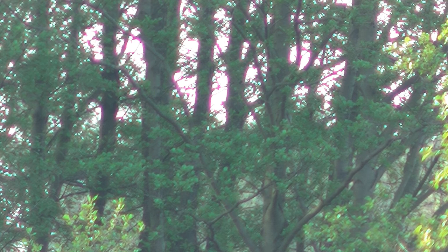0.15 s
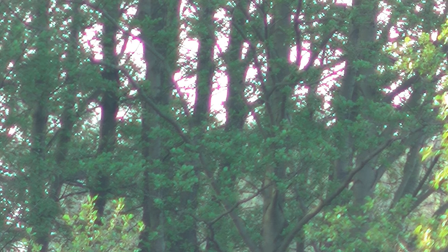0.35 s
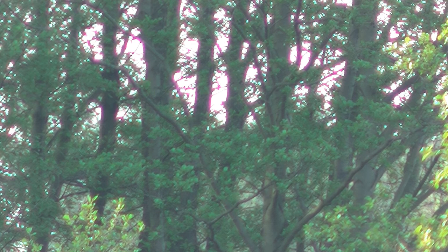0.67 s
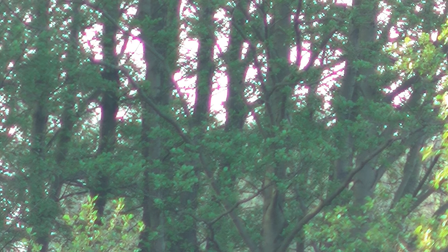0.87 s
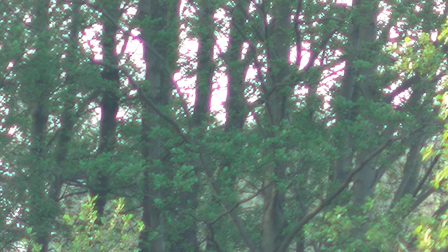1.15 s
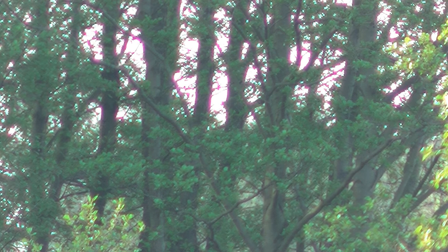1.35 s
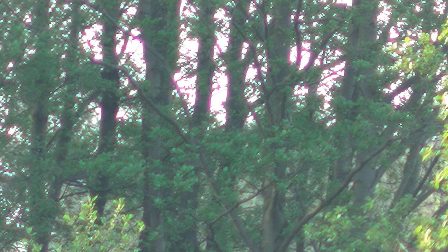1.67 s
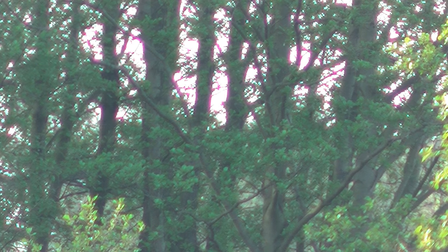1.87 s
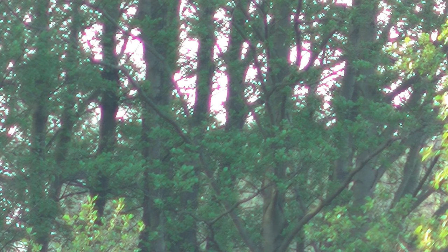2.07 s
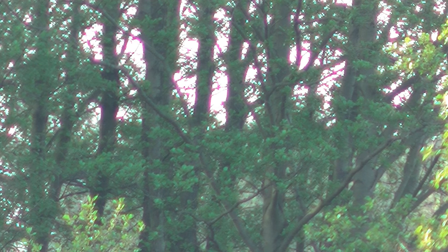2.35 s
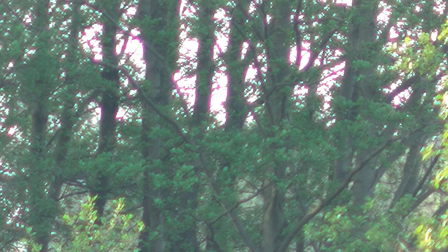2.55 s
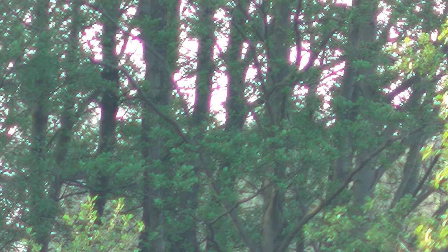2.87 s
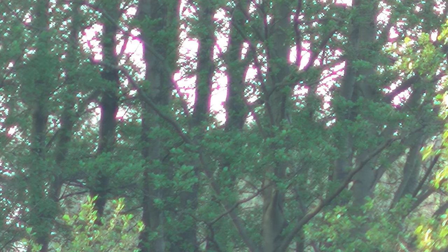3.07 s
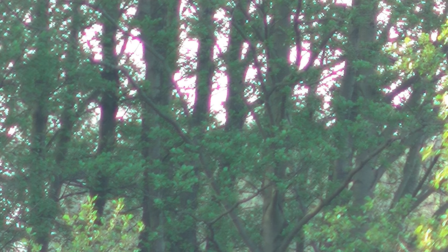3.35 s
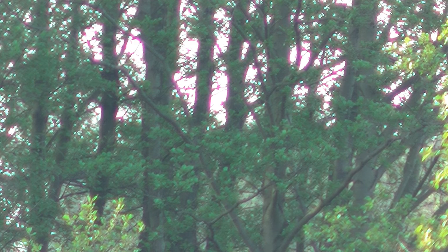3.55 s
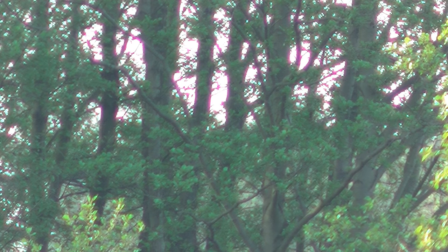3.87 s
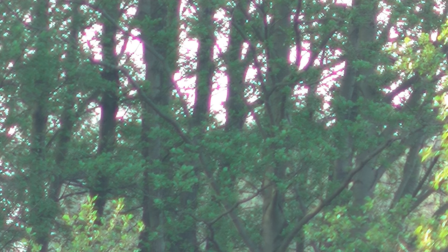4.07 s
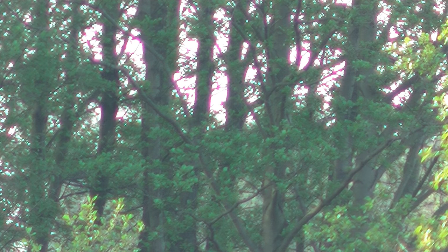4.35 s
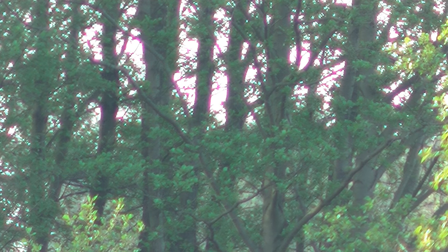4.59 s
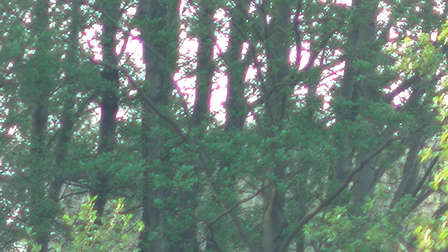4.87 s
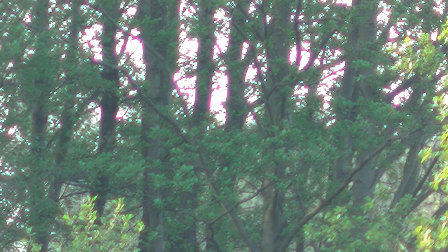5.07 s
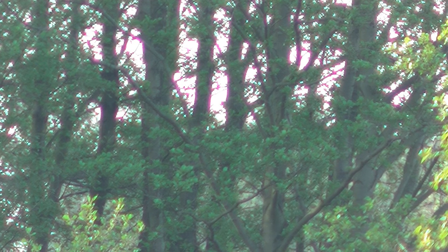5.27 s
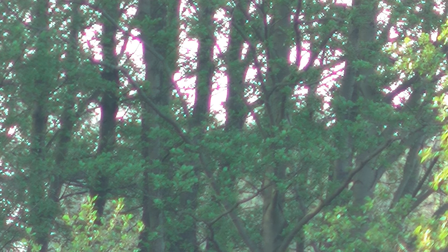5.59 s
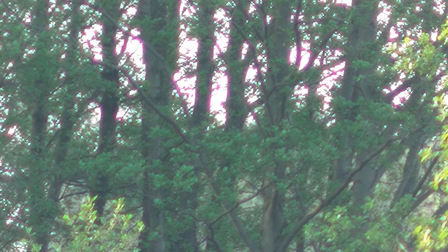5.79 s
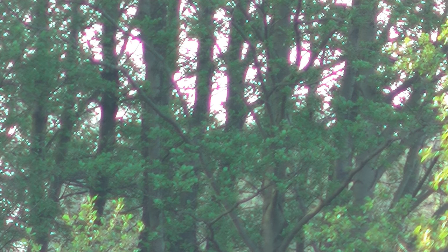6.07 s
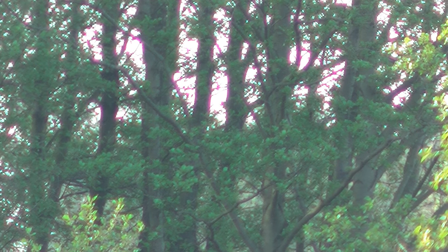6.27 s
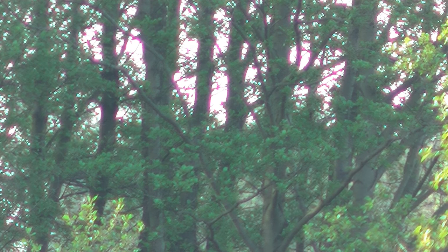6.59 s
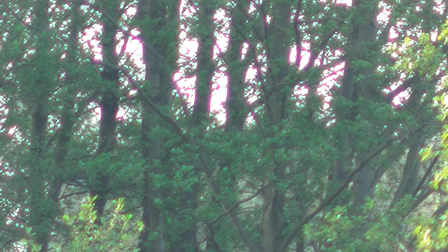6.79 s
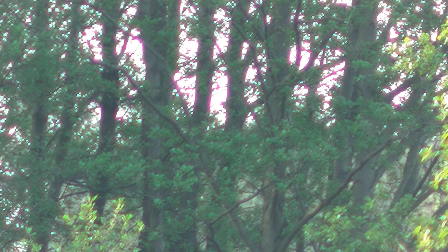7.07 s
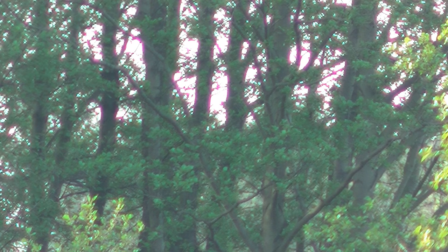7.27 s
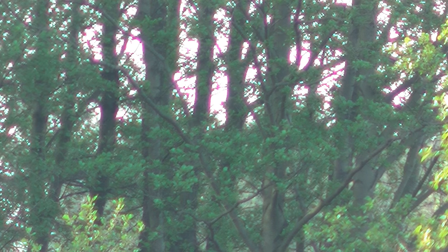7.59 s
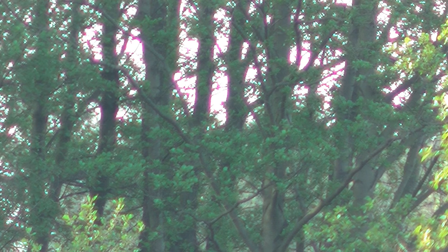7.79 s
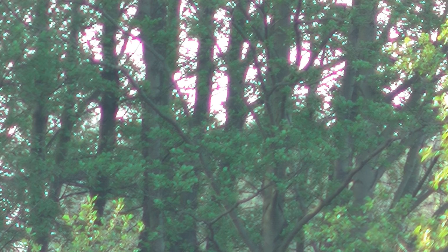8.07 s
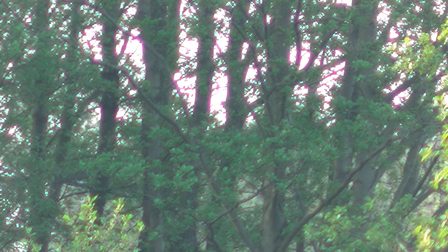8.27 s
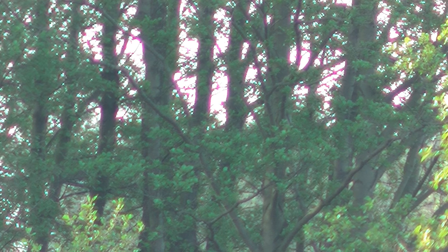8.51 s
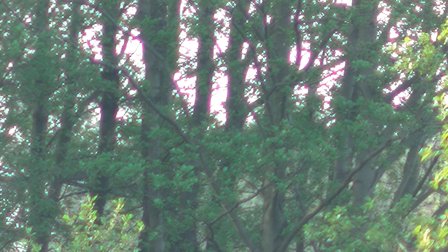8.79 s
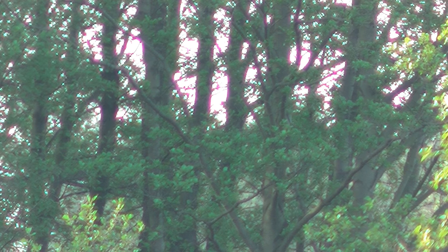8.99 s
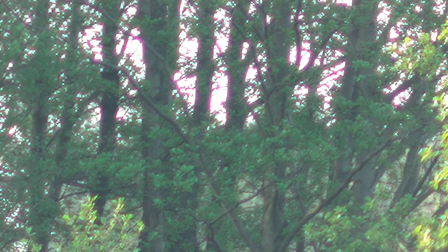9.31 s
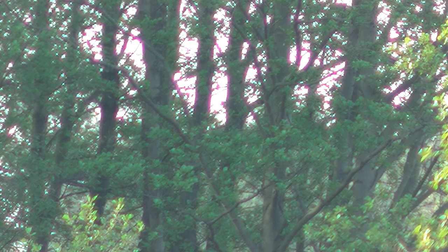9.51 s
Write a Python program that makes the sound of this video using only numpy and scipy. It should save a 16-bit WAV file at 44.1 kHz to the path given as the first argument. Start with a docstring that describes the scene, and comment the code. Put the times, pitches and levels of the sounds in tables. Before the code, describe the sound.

Quick gliding chirps and whistles fill a woodland, with two small bill snaps and a thin, high trill early on. A woodpecker then hammers out a single dry roll lasting about a second and a half. The singing continues through rattles and warbles, grows into louder sweeps and closes with short buzzes. Light echoes, faraway birds and a soft hiss with a faint high whine lie around the closer calls.

```python
"""Spring woodland. From the start, songbirds near and far chirp and whistle, each note a gliding tone of the
syrinx trailing echoes off the trunks. Two bill snaps and a high trill lead up to a woodpecker, which
drums one long roll on a dead limb from about 2 to 3.6 s, every blow a short, choked ring. The birds
sing on with warbles and rattles, then loud sweeps, and close on harsh buzzes after 9 s. Under it all
lie a distant chorus and the faint hiss and whine of air and circuits."""
import sys
import numpy as np
from scipy import signal
from scipy.fft import rfft, irfft, next_fast_len
from scipy.io import wavfile
from scipy.ndimage import uniform_filter1d, map_coordinates

SR = 44100
rng = np.random.default_rng(int(sys.argv[2]) if len(sys.argv) > 2 else 0)


def transcribe(signal):
    """Save signal, clipped to [-1, 1], as a 16-bit WAV file at the path in sys.argv[1]."""
    frames = np.atleast_2d(signal).T
    limited = np.clip(frames, -1, 1)
    pcm = np.round(limited * 32767).astype(np.int16)
    wavfile.write(sys.argv[1], SR, pcm)


N = 425565

# The landmarks of the roll. Each entry: a blow number, counted from 0.
LANDMARK_BLOWS = [0, 3, 8, 15, 18, 30, 31]
# The roll at those landmarks. Each row: time in seconds, relative level in dB.
ROLL_SHAPE = [(1.951, -24), (2.1105, -18.5), (2.377, -19), (2.7598, -18), (2.9224, -18.5), (3.5846, -18),
              (3.641, -22)]
# The ring of the dead limb. Each row: frequency in Hz, relative level in dB.
LIMB_MODES = [(1190, -6), (1290, 0), (1440, -7), (1760, -3), (2240, -9)]


def woodpecker_roll(pace_slip_s=.0007, force_slip_db=.7):
    """Each blow rings the limb for a few cycles; soft dead wood chokes it. The roll swells and slows."""
    number = np.arange(LANDMARK_BLOWS[-1] + 1)
    starts, levels = (np.interp(number, LANDMARK_BLOWS, column) for column in np.transpose(ROLL_SHAPE))
    slip = rng.standard_normal((len(number), 2))
    starts += pace_slip_s * slip[:, 0]
    levels += force_slip_db * slip[:, 1]
    out, t = np.zeros(N), np.arange(SR // 30) / SR
    attack = 1 - np.exp(-t / .0003)
    choke = np.exp(-(t / .0038) ** 4)
    tail = amp(-15 - 60 * t / .05)
    for start, db in zip(starts, levels):
        ring = sum(amp(mode_db + rng.normal(0, .8)) * np.sin(2 * np.pi * hz * t)
                   for hz, mode_db in LIMB_MODES)
        out[round((start - .001) * SR):][:len(t)] += amp(db - 5) * attack * (choke + tail) * ring
    return filtered(out, lambda f: 1 / (1 + (1110 / (f + 1)) ** 12))  # a slim limb radiates no bass


# The strokes of each syllable. Each row: delay and length in seconds, first, middle and last pitch
# in Hz, level in dB against the syllable.
SYLLABLE_STROKES = { "dive": [(0, 0.0148, 4154, 3845, 3500, 0), (.014, .021, 3424, 2945, 2420, -6)],
                    "low hook": [(0, .012, 2035, 1920, 1690, 1), (.04, 0.0228, 1380, 1870, 2200, -5)],
                    "swing": [(0, 0.024, 3195, 3785, 4190, 0), (.022, 0.016, 4066, 3570, 3300, -2)],
                    "plateau": [(0, .07, 3914, 3993, 3684, 0), (.003, 0.074, 2660, 2665, 2450, -10.5)],
                    "stutter": [(0, 0.015, 3610, 3585, 3480, 0.5), (.038, 0.028, 3645, 3830, 3770, 2),
                    (.048, .028, 2580, 2520, 2500, -6), (.002, .014, 4320, 4220, 4100, -8),
                    (.002, .014, 3000, 2910, 2780, -11), (.04, .018, 4350, 4450, 4400, -11),
                    (.04, .018, 3110, 3150, 3090, -6)], "rasp": [(0, .022, 4160, 3820, 3000, 0),
                    (.023, 0.028, 3100, 2730, 2600, -4.5), (.01, .032, 4500, 4000, 3300, -7)],
                    "double chip": [(0, .021, 3253, 3210, 2740, 0.5), (0, 0.015, 4270, 4025, 3690, -1.5)],
                    "climb": [(0, .062, 2806, 3415, 3870, 0), (.057, 0.012, 4030, 4000, 4000, -5)],
                    "slash": [(0, 0.013, 6600, 6240, 5500, 0)], "upturn": [(0, 0.012, 1970, 2230, 2550, 0)],
                    "hook": [(0, 0.017, 4050, 4100, 3450, 0)], "flick": [(0, .011, 4100, 4280, 4670, 0)],
                    "rattle": [(-.007, 0.0074, 4420, 3980, 3700, -10.5), (0, .012, 3674, 3200, 2917, 0)],
                    "kick": [(0, .068, 2800, 3220, 3380, -0.5), (0.032, .03, 3300, 3620, 4400, -1),
                    (.014, 0.037, 4120, 4180, 4700, -5.5), (0.0015, 0.035, 4500, 4780, 4950, -19.5)],
                    "tumble": [(0.0008, .026, 3100, 2550, 2050, -8.5), (.01, 0.0205, 4800, 4450, 4700, -15),
                    (.054, 0.01414, 3500, 3250, 2700, 0), (.067, .024, 2650, 2250, 2060, -3),
                    (.062, 0.02, 4800, 4500, 3800, -12)], "droop": [(0, .013, 2200, 2213, 1940, 0.5),
                    (.013, 0.0272, 1880, 1625, 1400, -11.5)], "whip": [(0, .018, 2800, 3350, 3900, 0)],
                    "tall whip": [(0, .013, 2910, 3500, 4190, 0), (.013, .006, 4300, 4400, 4400, -0.56)],
                    "low whip": [(0.0012, .02, 2400, 2500, 2860, 0)],
                    "sweep": [(0.0019, .032, 3050, 3850, 4400, 0), (0.035, .014, 4450, 4650, 4750, -8.5),
                    (0.0035, 0.044, 2420, 2640, 2880, -14.5)], "stab": [(0, .022, 4200, 3650, 3350, -1),
                    (0.014, .016, 3350, 3150, 2950, -5), (.037, 0.0176, 2950, 2750, 2550, -15),
                    (0.0046, 0.016, 4750, 4600, 4900, -16.5), (0.0072, 0.013, 4350, 3600, 3800, -3)],
                    "arc": [(0, 0.071, 3280, 3433, 3550, 0.2), (.06, .04, 3470, 3100, 2500, -2.2)],
                    "thin song": [(-.02, .08, 8090, 8050, 7990, -10), (.062, .115, 7950, 7880, 7850, -3),
                    (.265, .19, 7780, 7790, 7760, -4), (.517, 0.016, 6330, 7000, 7250, -1.5),
                    (.534, 0.029, 7250, 6830, 6250, 0), (.617, .015, 6300, 6900, 7100, -3),
                    (.632, 0.024, 7100, 6740, 6400, -3)]}
# The cues for each syllable. Each row: start in seconds, level in dB.
SYLLABLE_CUES = { "dive": [(.02, -21.5), (.303, -23), (.556, -21.5), (.787, -22), (1.017, -21.5)],
                 "low hook": [(.476, -33), (.709, -32), (.941, -35)], "swing": [(1.097, -26),
                 (1.208, -27.5), (1.318, -25.5), (1.427, -26.5)], "plateau": [(1.593, -27.5), (1.788, -26),
                 (2.023, -27)], "stutter": [(2.274, -29), (2.479, -24.5), (2.682, -22.5)],
                 "rasp": [(2.922, -23), (3.028, -25.5), (3.188, -26), (3.29, -29.5)],
                 "double chip": [(3.47, -29.5), (3.515, -22.5), (3.564, -23)], "climb": [(3.76, -22),
                 (4.027, -24)], "slash": [(3.74, -44), (3.822, -41), (3.837, -40), (3.851, -39)],
                 "upturn": [(3.963, -34), (3.982, -31), (4.005, -30.5)], "hook": [(4.249, -36), (4.3, -30),
                 (4.356, -24.5)], "flick": [(4.397, -32), (4.477, -31.5), (5.047, -31)],
                 "kick": [(5.378, -22.5), (5.666, -23), (5.911, -23)], "tumble": [(6.241, -24),
                 (6.466, -25), (6.693, -23.5)], "droop": [(6.075, -34), (6.347, -35.5), (6.598, -35),
                 (6.835, -33), (7.057, -35)], "whip": [(7.343, -23), (7.478, -22.5)],
                 "tall whip": [(7.288, -22), (7.657, -23.5)], "low whip": [(7.386, -29.5), (7.7, -30.5)],
                 "sweep": [(7.806, -22.5), (7.98, -21), (8.143, -21.5), (8.337, -20.5)],
                 "stab": [(8.558, -21), (8.741, -19.5), (8.961, -20.5)], "arc": [(9.062, -29.5),
                 (9.412, -25.5)], "thin song": [(2.75, -39), (9.0, -35)]}
# One-off notes. Each row: start and length in seconds, first, middle and last pitch in Hz, level in dB.
SINGLE_NOTES = [(.009, 0.054, 3300, 2974, 2610, -24.5), (.115, .039, 3460, 2710, 2500, -35.5),
                (.495, 0.058, 4240, 3880, 3330, -32.5), (.509, 0.048, 5610, 4960, 4500, -41),
                (0.739, 0.094, 3200, 2715, 2350, -32), (.877, .1, 5770, 4440, 4090, -32.5),
                (1.045, 0.038, 3850, 3740, 3730, -29), (1.275, 0.038, 3700, 3840, 3630, -30.5),
                (1.28, 0.097, 2450, 2550, 2390, -35), (1.45, .062, 2470, 2420, 2440, -41.5),
                (3.135, 0.045, 2985, 2800, 2550, -37), (2.444, .027, 3630, 3420, 3090, -32),
                (3.77, 0.064, 6900, 6700, 6420, -47), (3.864, 0.038, 5690, 5200, 5060, -36.5),
                (3.884, 0.055, 3770, 3450, 3460, -33.5), (3.911, 0.068, 1800, 1894, 2000, -39),
                (4.023, 0.047, 2023, 1960, 1900, -35), (4.131, 0.041, 3600, 4000, 4460, -37.5),
                (4.386, 0.067, 3620, 3050, 2440, -24), (4.455, 0.046, 2750, 2910, 2900, -34),
                (4.544, 0.088, 1970, 2100, 2220, -31), (4.548, 0.032, 3950, 3680, 3550, -31.5),
                (4.66, 0.081, 3300, 3680, 3780, -31), (4.881, 0.058, 3450, 3240, 2980, -24),
                (5.294, 0.078, 2530, 2440, 2390, -33.5), (5.362, 0.056, 1720, 1786, 1800, -36.5),
                (6.888, 0.038, 3800, 3150, 2870, -36.5), (6.993, 0.024, 3770, 2920, 4030, -28.5),
                (7.068, 0.026, 2340, 2610, 4450, -30.5), (7.103, 0.02, 4160, 3820, 3790, -28.5),
                (7.515, 0.022, 2480, 2420, 2420, -33), (7.752, 0.0257, 2400, 2970, 3260, -26.5),
                (8.524, 0.04, 4200, 4050, 3980, -32.5), (8.686, 0.049, 3440, 3430, 3610, -24.5),
                (8.854, 0.037, 4580, 4100, 3600, -34.5), (9.125, 0.057, 2080, 2200, 2290, -48),
                (9.574, .033, 4600, 4990, 4900, -40)]
# Runs of falling strokes. Each row: start, length and spacing in seconds, level in dB.
RATTLE_RUNS = [(4.518, .14, .0213, -25), (4.815, .15, .023, -26), (5.104, .125, .0227, -25)]


def near_bird_notes(rattle_ends_db=-4):
    """Every stroke of the near birds as rows for chirps(): single notes, syllables and rattles."""
    rattles = [(start + delay, db + rattle_ends_db * (2 * delay / length - 1) ** 2)
               for start, length, spacing, db in RATTLE_RUNS for delay in np.arange(0, length, spacing)]
    cues = {**SYLLABLE_CUES, "rattle": rattles}
    return SINGLE_NOTES + [(start + delay, *shape, db + stroke_db)
                           for name in cues for start, db in cues[name]
                           for delay, *shape, stroke_db in SYLLABLE_STROKES[name]]


def chirps(notes):
    """Each syrinx note bends along a parabola, swelling and fading almost evenly."""
    out = np.zeros(N)
    for start, length, first, middle, last, db in notes:
        reach = .00312 / length  # soft ends reach a little past the body of the note
        u = np.linspace(-reach, 1 + reach, round((length + .00553) * SR))
        hz = first * (1 - u) + last * u + 4 * u * (1 - u) * (middle - (first + last) / 2)
        swell = np.abs(np.sin(np.pi * np.linspace(0, 1, len(u)) ** 1.055)) ** .55
        add_tone(out, start - .003, hz, amp(db) * swell)
    return out


# Phrases sung on both sides of the syrinx. Each row: start and end in seconds.
TWO_VOICED_PHRASES = [(3.75, 4.1), (5.35, 6), (7.79, 9.05)]
# Their extra tones. Each row: multiple of the pitch, level in dB against a note sung at -20 dB.
MIXING_TONES = [(1 / 2, -19), (2 / 3, -16), (4 / 3, -28)]


def side_tones(notes):
    """The two voices mix into tones around the pitch, growing faster than the note itself."""
    voiced = [note for note in notes if any(start < note[0] < end for start, end in TWO_VOICED_PHRASES)]
    return chirps((start, length, k * first, k * middle, k * last, db + tone_db + .8 * (db + 20))
                  for start, length, first, middle, last, db in voiced for k, tone_db in MIXING_TONES)


# Phrases with a rasp. Each row: start and end in seconds, added depth of the time shake in ms.
RASP_PHRASES = [(0, 1.03, .02), (1.04, 1.09, .06), (1.27, 1.31, .06), (1.55, 2.1, .018), (2.25, 2.85, .035),
                (2.9, 3.35, .09), (5.35, 6, .02), (7.8, 9.02, .022), (9.14, 9.65, .04)]


def breath_rasp(song):
    """Breath flutters the level; a shake near 125 Hz roughens the pitch, most in rasping phrases."""
    t = np.arange(N) / SR
    depth_ms = .007 + sum(ms * ((start < t) & (t < end)) for start, end, ms in RASP_PHRASES)
    depth_ms = uniform_filter1d(depth_ms, size=500)
    shake = np.sin(2 * np.pi * np.cumsum(125 + 25 * wobble(40)) / SR)
    flutter = amp(2.52 * wobble(260))
    return flutter * map_coordinates(song, [np.arange(N) + depth_ms * SR / 1000 * shake])


# One contour per whistle. Each row: time in seconds, pitch in Hz, level in dB.
WHISTLE_CONTOURS = [
    [(.237, 1910, -30), (.278, 2484, -27.5), (.359, 2620, -24.5), (.377, 2904, -26.5), (.507, 2750, -30),
     (.536, 2556, -25.5)],
    [(4.179, 1920, -33), (4.225, 2323, -23), (4.295, 2390, -20.5), (4.327, 2240, -43)],
    [(4.275, 1985, -33), (4.399, 1734, -38.5)],
    [(4.632, 2790, -20), (4.642, 2235, -21.5), (4.65, 2806, -22), (4.657, 2500, -16.5), (4.666, 2504, -20),
     (4.76, 2640, -21.5), (4.91, 2650, -28)],
    [(5.602, 2370, -30), (5.696, 2740, -19.5), (5.741, 2935, -25.5), (5.76, 2730, -54)],
    [(8.197, 5820, -45), (8.255, 5610, -41.5), (8.33, 5510, -46), (8.37, 5570, -46), (8.46, 5650, -57)],
]


def whistles():
    """Held syrinx notes follow their contours, with soft ends."""
    out = np.zeros(N)
    for contour in WHISTLE_CONTOURS:
        times, hz, db = np.transpose(contour)
        t = np.arange(times[0], times[-1], 1 / SR)
        fade = np.clip(np.minimum(t - t[0], t[-1] - t) / .0024, 0, 1)
        glide = uniform_filter1d(np.interp(t, times, hz), size=120)
        add_tone(out, times[0], glide, amp(np.interp(t, times, db)) * fade)
    return out


# Wavering notes. Each row: start and length in seconds, first and last pitch in Hz, waver rate in Hz
# (negative dips first), waver depth in Hz, level in dB.
WARBLE_NOTES = [(3.385, .07, 3150, 3000, -22, 190, -33), (4.635, .105, 2050, 1900, 55, 130, -31),
                (5.413, .13, 1880, 2000, 34.5, 200, -31.5)]


def warbles():
    """Low notes slide under a wide waver."""
    out = np.zeros(N)
    for start, length, first, last, waver_hz, depth_hz, db in WARBLE_NOTES:
        t = np.arange(0, length, 1 / SR)
        hz = first + (last - first) * t / length + depth_hz * np.sin(2 * np.pi * waver_hz * t)
        add_tone(out, start, hz, amp(db) * np.sin(np.pi * t / length) ** .51)
    return out


# The closing buzzes. Each row: start and length in seconds, relative level in dB.
BUZZ_CUES = [(9.148, 0.052, -31), (9.218, 0.027, -31), (9.359, 0.034, -29.5), (9.428, 0.033, -36),
             (9.6, .05, -30.5)]


def buzzes():
    """Each harsh note is an uneven, sinking rush of tiny falling strokes."""
    strokes = []
    for start, length, db in BUZZ_CUES:
        for delay, (late, detune, force) in zip(np.arange(0, length, .0015), rng.normal(size=(40, 3))):
            hz = (3750 - 6000 * delay) * (1 + (.06 + delay) * detune)
            stroke_db = db - 3 - 60 * delay + 2 * force
            strokes.append((start + delay + .002 * late, .005, 1.1 * hz, hz, .9 * hz, stroke_db))
    return chirps(strokes)


# The high trill. In order: start, spacing and note length in seconds, first, middle and last pitch
# in Hz, opening level in dB.
HIGH_TRILL = (1.515, .0195, .016, 4950, 5400, 5900, -39)


def trill(count=11, fade_db=1.9):
    """A fading run of quick rising notes."""
    start, spacing, *shape, db = HIGH_TRILL
    return chirps((start + k * spacing, *shape, db - fade_db * k) for k in range(count))


# The bill snaps. Each row: start in seconds, relative level in dB.
SNAP_CUES = [(0.9043, -16.5), (1.493, -27)]
# The ring of a snap. Each row: frequency in Hz, relative level in dB, time to fall 60 dB in seconds.
SNAP_MODES = [(7480, -1.5, 0.0097), (5300, -1, 0.0049), (10000, -15, .006)]


def bill_snaps():
    """A bill shuts with a hard click of three brief rings."""
    out, t = np.zeros(N), np.arange(SR // 50) / SR
    ring = sum(amp(db - 60 * t / t60) * np.sin(2 * np.pi * hz * t) for hz, db, t60 in SNAP_MODES)
    attack = 1 - np.exp(-t / .00062)
    for start, db in SNAP_CUES:
        out[round((start - .0015) * SR):][:len(t)] += amp(db + 8) * ring * attack
    return out


# The fader ride of the distant chorus. Each row: time in seconds, relative level in dB.
CHORUS_RIDE = [(0.0, -28.5), (0.48, -30.5), (0.56, -30.5), (2.79, -32.5), (3.33, -32.5), (3.79, -34.5),
               (4.78, -28.5), (4.939, -29), (5.94, -34.5), (8.49, -34.5), (9.65, -33.5)]
# The tone of its wash. Each row: frequency in Hz, relative spectral level in dB.
WASH_SPECTRUM = [(880, -42.5), (1500, -7), (2740, -6), (3190, 5.5), (3970, -6), (4980, -12), (6000, -23),
                 (7800, -65), (13200, -120)]


def far_chorus(count=1500):
    """Many faint notes of distant birds, and the wash into which the farthest merge."""
    when, size, height = rng.random((count, 3)).T
    bend, db = rng.normal(0, (330, 3), (count, 2)).T
    hz = 2150 + 2250 * height
    chatter = chirps(zip(when * N / SR, .007 + .03 * size ** 2, hz - bend, hz, hz + .6 * bend, db))
    wash = filtered(rng.standard_normal(N), lambda f: amp(along(WASH_SPECTRUM, f)))
    ride = amp(np.interp(np.arange(N) / SR, *np.transpose(CHORUS_RIDE)))
    return ride * amp(-7.5) * unit(chatter), ride * amp(-9.5) * unit(wash)


def twitters(count=260, low_hz=4400, high_hz=7000, level_db=-57):
    """Small birds high in the crowns: faint, short, high notes, mostly falling."""
    when, size, height = rng.random((count, 3)).T
    bend, db = rng.normal((200, level_db), (250, 4), (count, 2)).T
    hz = low_hz + (high_hz - low_hz) * height ** 2
    return chirps(zip(when * N / SR, .008 + .03 * size ** 2, hz + bend, hz, hz - bend, db))


# The woodland reverb. Each row: frequency in Hz, time to fall 60 dB in seconds.
ECHO_DECAY = [(1000, 0.36), (3000, 0.18), (8000, 0.34)]


def trunk_echoes(x, size=16384):
    """Trunks scatter echoes, as mid and side; the air moves, so each stretch meets a new pattern."""
    out, x = np.zeros((2, N + 2 * SR)), np.pad(x, size)
    for i in range(0, N + size, size // 2):
        hz, t, noise = signal.stft(rng.standard_normal((2, SR // 3)), SR, nperseg=256)
        tail = signal.istft(noise * amp(-60 * t / along(ECHO_DECAY, hz)[:, None]), SR, nperseg=256)[1]
        stretch = x[None, i:i + size] * np.hanning(size)
        wet = signal.fftconvolve(stretch, tail / np.linalg.norm(tail[0]), axes=1)
        out[:, i + 200:][:, :wet.shape[1]] += wet
    return out[:, size:size + N]


# The tone of the noise floor. Each row: frequency in Hz, relative spectral level in dB.
HISS_SPECTRUM = [(25, -23.5), (200, -23.5), (500, -1), (1000, 9.5), (2000, 7.5), (5000, 6.5), (7900, 5),
                 (8200, 4), (15800, -2)]


def hiss():
    """Air and circuit noise as mid and side, with a wavering whine and a thin steady tone in the mid."""
    t = np.arange(N) / SR
    air = unit(filtered(rng.standard_normal((2, N)), lambda f: amp(along(HISS_SPECTRUM, f))))
    beating_pair = np.sin(2 * np.pi * 7813 * t) * np.cos(2 * np.pi * 12 * t)
    narrow_noise = unit(filtered(rng.standard_normal(N), lambda f: 1 / (1 + ((f - 7830) / 25) ** 2)))
    whine = .55 * narrow_noise + 2.3 * beating_pair
    thin_tone = np.sin(2 * np.pi * 15625 * t)
    air[0] += amp(-14.5) * whine + amp(-25) * thin_tone
    return amp(-45.5) * air


def add_tone(out, start, hz, gain):
    """Adds a syrinx tone, a sine with a weak overtone, at start seconds."""
    phase = 2 * np.pi * np.cumsum(hz) / SR
    part = out[max(round(start * SR), 0):][:len(hz)]
    part += (2 ** .5 * gain * (np.sin(phase) + amp(-40) * np.sin(2 * phase)))[:len(part)]


def amp(db):
    return 10 ** (np.asarray(db) / 20)


def unit(x):
    return x / np.sqrt(np.mean(x ** 2) + 1e-20)


def along(points, hz):
    """Reads a curve of (Hz, value) points on a log frequency axis."""
    f, values = np.transpose(points)
    return np.interp(np.log(hz + 1), np.log(f + 1), values)


def filtered(x, response):
    """Shapes x by a gain that depends on frequency in Hz."""
    size = next_fast_len(N + SR // 2)
    return irfft(rfft(x, size) * response(np.fft.rfftfreq(size, 1 / SR)), size)[..., :N]


def wobble(rate):
    """A smooth random curve, rate knots a second."""
    knots = rng.standard_normal(int(N * rate / SR) + 4)
    return unit(map_coordinates(knots, [np.arange(N) * rate / SR]))


# The stereo width. Each row: frequency in Hz, gain of the side channel in dB.
STEREO_WIDTH = [(30, -10), (90, -6), (300, -0.5), (700, -4), (1500, -10), (3000, -18.5), (6000, -54)]


def scene(rasp_below_hz=4800):
    """Birds and drumming sit in the centre; echoes, wash and hiss spread around them."""
    chatter, wash = far_chorus()
    notes = near_bird_notes()
    low = chirps(note for note in notes if note[3] < rasp_below_hz)  # split by middle pitch
    high = chirps(note for note in notes if note[3] >= rasp_below_hz)
    rough = breath_rasp(low + side_tones(notes) + buzzes() + chatter)
    songs = rough + high + twitters() + trill() + warbles() + whistles()
    knocks = woodpecker_roll() + bill_snaps()
    echo = trunk_echoes(amp(-5) * songs + amp(-2) * chatter + amp(-13.5) * knocks)
    mid, side = echo + hiss() + [songs + knocks + wash, amp(-4.5) * np.roll(wash, 3000)]
    side = filtered(side, lambda f: amp(along(STEREO_WIDTH, f))) - .02 * mid  # leans a touch right
    return np.array([mid + side, mid - side])


def record(dry):
    """A hard band limit cuts the very top of the treble."""
    return filtered(dry, lambda hz: hz < 15800)


dry = scene()
out = record(dry)
transcribe(out)
```